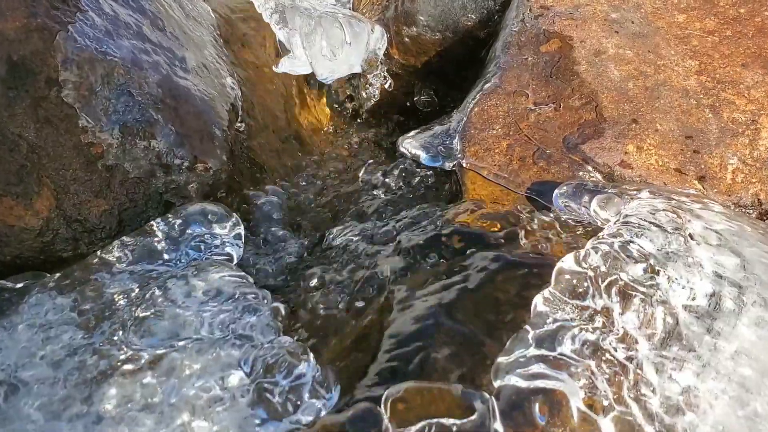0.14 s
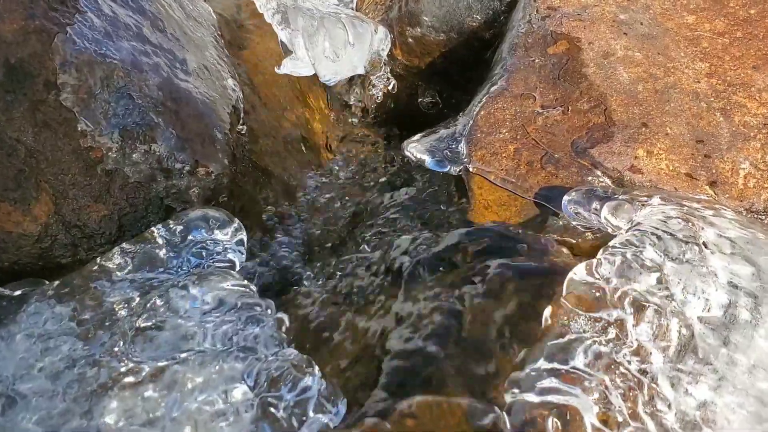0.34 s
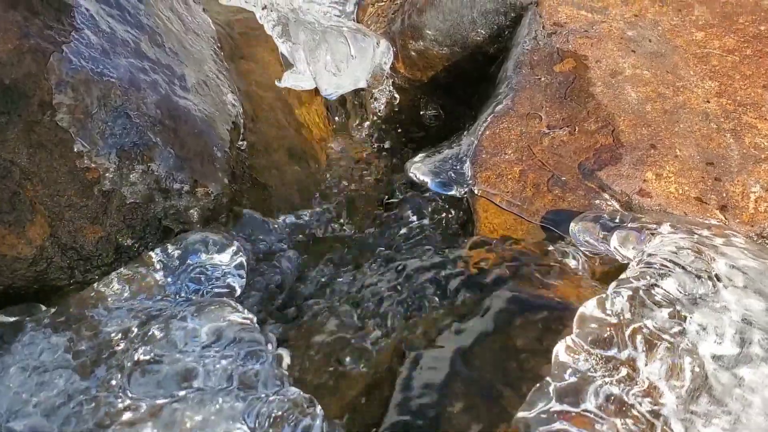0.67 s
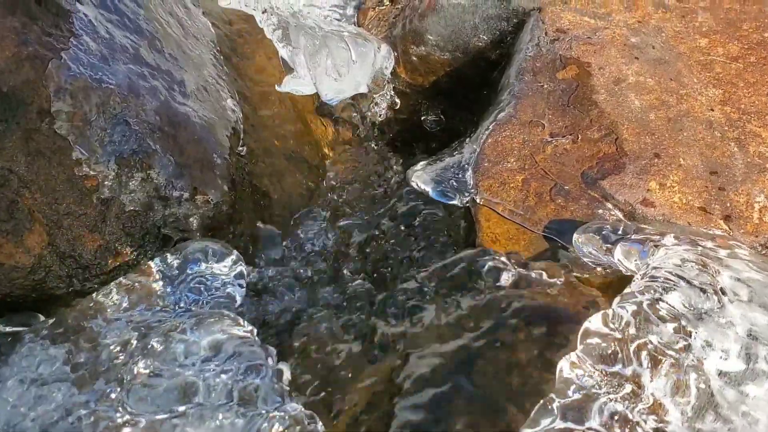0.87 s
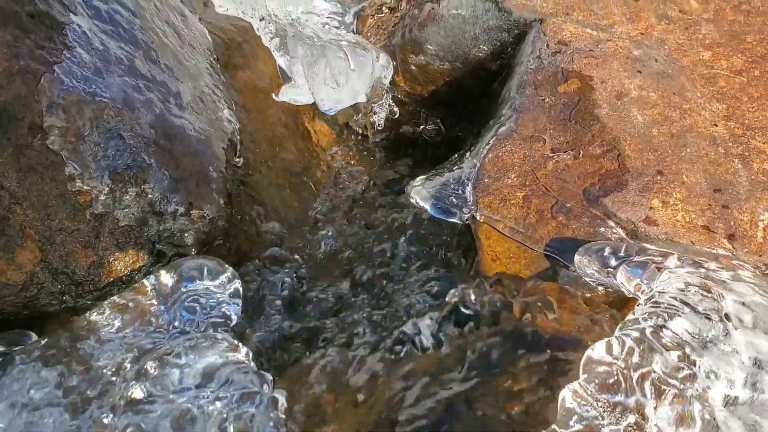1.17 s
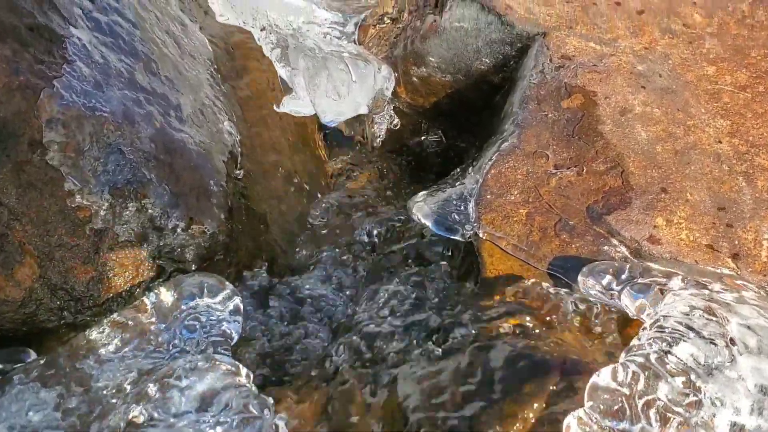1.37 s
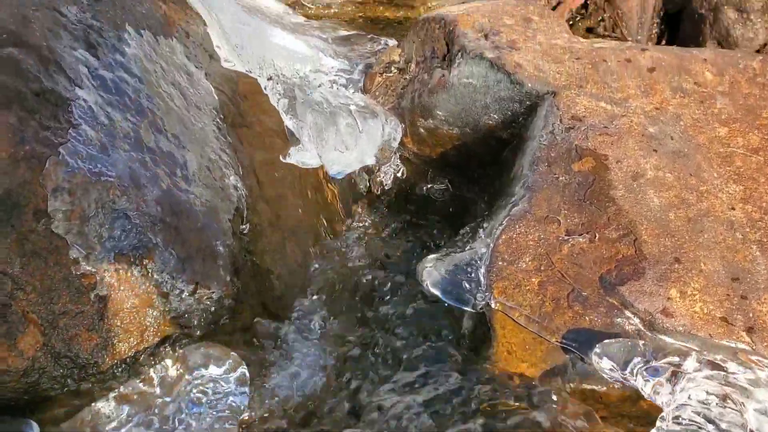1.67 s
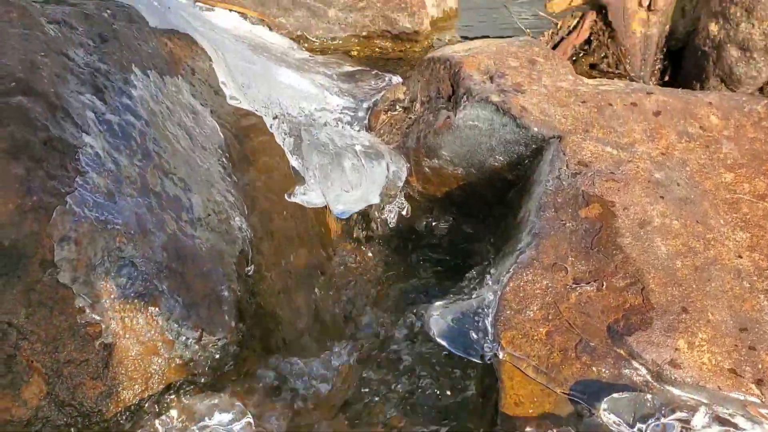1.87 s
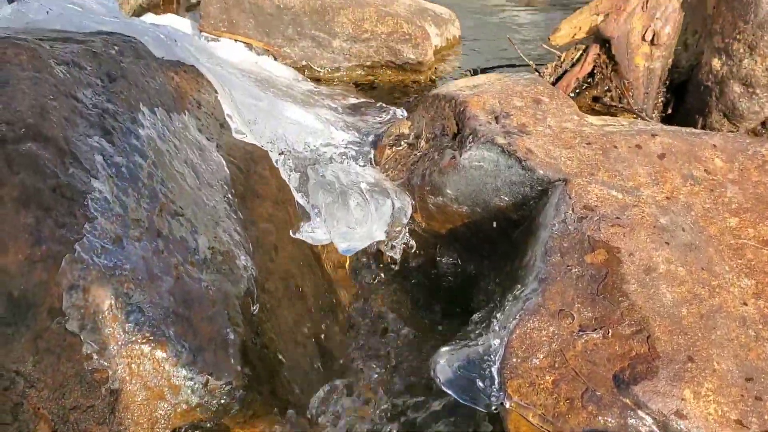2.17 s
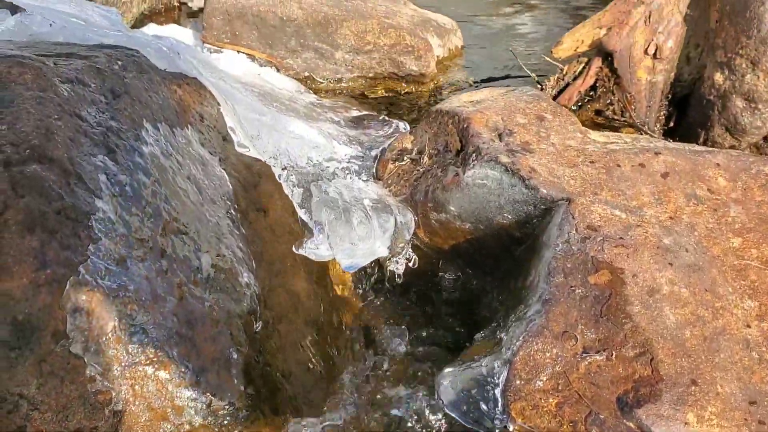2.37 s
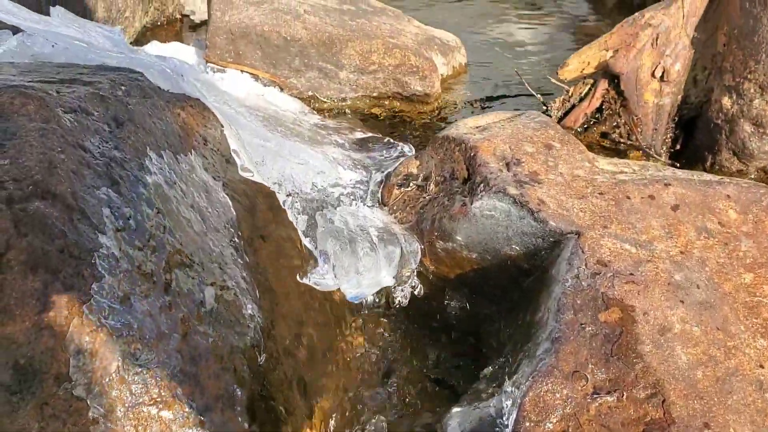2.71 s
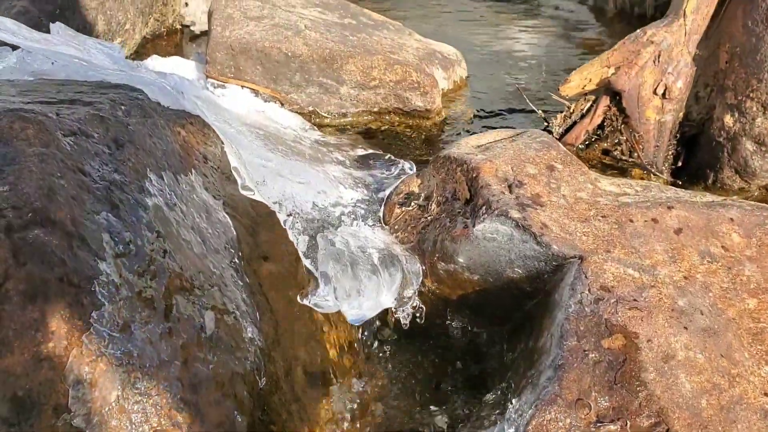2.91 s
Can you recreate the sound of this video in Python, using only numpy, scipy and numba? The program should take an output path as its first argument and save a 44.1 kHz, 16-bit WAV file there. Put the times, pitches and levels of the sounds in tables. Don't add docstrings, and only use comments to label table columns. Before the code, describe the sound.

Close, steady babble of a shallow brook over rocks, with ringing bubbles, small drips and a soft background hiss, while irregular wind rumbles and flutters on a hand-held camera's microphone before fading near the end.

```python
import sys
import numpy as np
from scipy import signal
from scipy.fft import irfft, next_fast_len
from scipy.io import wavfile
from scipy.ndimage import uniform_filter1d
from numba import njit

SR = 44100
rng = np.random.default_rng(int(sys.argv[2]) if len(sys.argv) > 2 else 0)


def wrap_up_sound(samples):
    columns = np.atleast_2d(samples).T
    tamed = np.clip(columns, -1, 1)
    steps = np.round(tamed * 32767).astype(np.int16)
    wavfile.write(sys.argv[1], SR, steps)


def how_loud(loudness_db):
    steps = np.asarray(loudness_db, float) / 20
    return 10 ** steps


N = 134505

# time in seconds, flow level in dB.
FLOW = [
    (0.0, -37),
    (2.04, -39),
    (3.05, -39),
]
# frequency in Hz, density in dB per Hz.
WATER_SPECTRUM = [(300, -3.5), (520, -3.5), (950, -10), (1500, -14), (2800, -17.5), (6700, -23),
                  (8100, -27), (16000, -28)]
# frequency in Hz, gain in dB.
WATER_LOW_FADE = [(100, -24), (300, 12)]
# frequency in Hz, density in dB per Hz.
WIND_SPECTRUM = [(25, -34), (50, -3.5), (80, -0.5), (130, -4.5), (250, -8), (450, -18), (1000, -34.5),
                 (2000, -59)]
# time in seconds, level in dB, brightness in dB per octave.
GUSTS = [(.24, -38, -4.5), (.42, -20, -5), (.53, -30.5, -1), (.84, -25, 0), (1.14, -26, -4),
         (1.27, -28.5, -4), (1.47, -18.5, 0.5), (1.58, -25, -2.5), (1.78, -35.5, -5.5), (1.86, -27.5, -3),
         (2.0, -28.5, -2.5), (2.1, -31, 5.5), (2.24, -23, 0.5), (2.35, -29, -3), (2.46, -24.5, 2),
         (2.62, -30.5, 1), (2.86, -29.5, -3), (2.95, -36, -10)]
# peak time in seconds, peak in dB, pitch in Hz,
# left minus right in dB.
THUMPS = [(0.458, -23, 70, 1), (0.5931, -19.5, 58, 4.0), (0.676, -17.5, 54.4, 0),
          (0.8536, -20.5, 113, 10.0), (0.9177, -12, 93, 3), (1.042, -19.5, 125, 3), (1.192, -11, 98, 0),
          (1.209, -8, 81, 0), (1.3291, -14.5, 84, 0), (1.4678, -17, 83, -1.0), (1.8723, -18.5, 77.4, 0),
          (2.045, -19, 118, 0), (2.1927, -16.5, 92, 1.0), (2.2253, -16, 61.4, 3), (2.269, -16.5, 64.5, 6),
          (2.43, -17, 128, 7), (2.4529, -16, 121, 3), (2.7406, -20.5, 60, -2), (2.864, -21.5, 74.5, -3)]
# peak time in seconds,
# peak in dB, pitch in Hz, left minus right in dB.
SWAYS = [(0.624, -10.5, 72, 0.5), (0.8278, -14.5, 79.6, -7), (0.9996, -16.0, 83, 2),
         (1.1096, -15.5, 85.5, -10.5), (1.2544, -15, 65.4, -3), (1.3723, -13.5, 81, -3),
         (1.421, -10.5, 71.6, -2), (1.613, -16, 91, 0.0), (2.026, -17.5, 85, 0), (2.1105, -16.5, 66, 6),
         (2.4017, -12.5, 95, 2), (2.5077, -18, 89, 1)]
# peak time in seconds, peak in dB, pitch in Hz, left minus right in dB.
SNAPS = [(0.142, -21.5, 326, -1), (0.237, -19, 353, 1), (0.3818, -27, 396, 5), (0.4392, -14.5, 406, -3),
         (0.542, -12, 213, 6), (0.602, -17.5, 387, -3.0), (0.742, -13.5, 348, -2), (0.799, -13, 250, 0),
         (0.8123, -14, 200, -5), (0.8592, -14.5, 253, 1), (0.9817, -17.5, 187, 10.5), (1.06, -21, 181, 9),
         (1.193, -10, 177, -2), (1.211, -11, 170, -4), (1.4115, -18.5, 386, 2.0), (1.4459, -18.5, 361, 6),
         (1.504, -15.5, 400, 2), (1.521, -21, 406, 3), (2.0431, -20.0, 430, -7.0), (2.0783, -14, 420, 4),
         (2.079, -13.5, 246, 0.0), (2.1046, -16.0, 475, -10), (2.1056, -17, 290, 2), (2.143, -18, 320, -4),
         (2.1935, -10.5, 447, -3), (2.2314, -11.5, 460, -4), (2.247, -10, 302, 1), (2.4593, -11.5, 210, 2),
         (2.4725, -15.5, 354, 1), (2.535, -18, 347, -3), (2.6943, -20.0, 206, 11.5),
         (2.8117, -24.5, 188, 17.5)]
# time in seconds, peak in dB.
SPRAYS = [(0.1235, -22.5), (0.2698, -21.5), (0.3662, -25), (0.4165, -24.5), (0.735, -24), (0.754, -22.5),
          (0.772, -22), (1.1394, -26), (1.1767, -22), (1.2456, -29), (1.3114, -26.5), (1.3933, -26),
          (1.7669, -25), (1.8176, -30), (1.9664, -27), (2.1794, -27.5), (2.4493, -24), (2.5232, -26),
          (2.5394, -17), (2.8095, -27), (2.8405, -22), (2.9307, -27), (2.6, -23), (1.598, -28.5),
          (0.838, -24.5)]
# peak time in seconds, peak in dB, pitch in Hz.
GLUGS = [(0.0585, -27.5, 700), (0.141, -26, 715), (0.1951, -21, 800), (0.1955, -25.5, 1321),
         (0.2709, -34, 1340), (0.2863, -25, 1149), (0.5087, -28, 1080), (0.6675, -20.5, 960),
         (0.7112, -22.5, 633), (0.79, -29, 755), (0.8571, -24.0, 750), (1.002, -24, 925),
         (1.0068, -29, 1282), (1.1628, -29, 590), (1.1889, -21.5, 930), (1.3815, -27, 547),
         (1.5034, -27, 602), (1.5397, -26, 1563), (1.7696, -34, 1600), (1.7706, -21.5, 625),
         (2.0622, -27.5, 1610), (2.1093, -31, 844), (2.1312, -27, 1340), (2.1416, -31, 547),
         (2.1776, -29, 1274), (2.5227, -31.0, 1243), (2.5427, -21, 840), (2.5639, -28, 1258),
         (2.7784, -25, 876), (2.7794, -24.5, 1340), (2.8081, -20, 914), (2.819, -19, 1510),
         (2.8438, -26, 616), (2.9151, -34, 1210)]
# peak time in seconds, peak in dB, pitch in Hz.
PLINKS = [(0.1058, -28, 3230), (0.1103, -20, 2520), (0.1235, -31, 2709), (0.1393, -27.5, 2834),
          (0.1915, -27, 2040), (0.3072, -31, 4009), (0.3083, -13, 3300), (0.3456, -26.5, 2950),
          (0.368, -23, 7062), (0.418, -19, 7094), (0.4777, -30, 7050), (0.5171, -27.0, 2070),
          (0.5628, -25.0, 5370), (0.7032, -22.5, 4200), (0.7315, -21, 6640), (0.9968, -22, 3038),
          (1.1408, -21.5, 6470), (1.1525, -20, 2760), (1.1712, -34, 3664), (1.3281, -19, 2450),
          (1.3949, -23.5, 7120), (1.4811, -20, 2340), (1.5566, -22, 1990), (1.5981, -21, 6100),
          (1.7219, -23, 4130), (1.9487, -20.5, 4640), (2.1419, -31, 3950), (2.4507, -24.5, 3554),
          (2.4508, -31, 4500), (2.5385, -23, 3429), (2.5407, -20, 4870), (2.5413, -26, 6812),
          (2.7007, -25.5, 3620), (2.7823, -18.5, 4100), (2.9319, -23, 6600)]

HISS_DB, BURST_DB, BURST_PER_S, HISS_FLICKER_DB = -2.5, 1.96, 50, 0.77
WIND_DB, WIND_PAN_DB, EDDIES_PER_S, EDDY_CYCLES, EDDY_SPREAD_DB = 1.5, 2.5, 900, 1.53, 2
FLUTTER_DB, FLUTTER_OWN_DB, FLUTTER_PER_S = 0.83, 2.5, 30
SURGE_DB, SURGE_S = -14.5, 0.043
THUMP_DB, THUMP_CYCLES, SNAP_DB, SNAP_CYCLES = -2.5, 1.92, -5.5, 2.95
BUBBLES_PER_S, BUBBLE_CYCLES, BUBBLE_SPREAD_DB, BUBBLE_DB, BUBBLE_GLIDE = 3000, 8, 3.5, 2, 0.16
CROWD_CAP_DB = 9.5
NEAR_LAG_S, FAR_LAG_S, LAG_SPREAD_S = -0.00028, 0.00036, 0.00004
NEAR_SHARE, WATER_PAN_DB = 0.6, -2.5
SPRAY_DB, SPRAY_S = -20, 0.009
GLUG_DB, GLUG_CYCLES, PLINK_DB, PLINK_CYCLES, POP_GLIDE = 5, 6.98, 2.5, 10.5, 0.052
PEAK_AT = 0.25
ROCK_T60_S, ROCK_DB = 0.02, -10


def colour(table, hz):
    table = np.array(table)
    return np.interp(np.log(hz), np.log(table[:, 0]), table[:, 1])


def set_treble(x, db):
    top = signal.sosfilt(signal.butter(2, 1500, "high", fs=SR, output="sos"), x)
    return x * how_loud(db) / np.sqrt(np.mean(top ** 2))


def walk(rate_hz):
    hold = int(SR / rate_hz)
    steps = np.repeat(rng.standard_normal(N // hold + 1), hold)[:N]
    return 1.3 * uniform_filter1d(uniform_filter1d(steps, hold), hold)


@njit
def rings(start_s, hz, cycles, size, glide):
    out = np.zeros(N)
    for e in range(len(start_s)):
        span = cycles[e] * SR / hz[e]
        first = int(start_s[e] * SR)
        step = 2j * np.pi * hz[e] / SR
        z = size[e] + 0j
        turn = 10 ** (-1 / span) * np.exp(step)
        bend = np.exp(step * glide / span)
        rise, quick = 1.0, np.exp(-6 / span)
        for j in range(int(2 * span) + 2):
            if 0 <= first + j < N:
                out[first + j] += (1 - rise) * z.imag
            z *= turn
            turn *= bend
            rise *= quick
    return out


def hiss(flow_db, burst):
    n = next_fast_len(N)
    f = np.fft.rfftfreq(n, 1 / SR) + 1
    spectrum = how_loud(colour(WATER_SPECTRUM, f) + colour(WATER_LOW_FADE, f))
    out = 0
    for hz in 150 * 2 ** np.arange(0, 7, 0.5):
        shape = spectrum * np.cos(np.clip(np.log2(f / hz), -0.5, 0.5) * np.pi)
        noise = rng.standard_normal((2, len(f))) + 1j * rng.standard_normal((2, len(f)))
        band = irfft(noise * shape, n)[:, :N]
        out = out + band * how_loud(BURST_DB * burst * min(0.1 + hz / 4000, 1) + HISS_FLICKER_DB * walk(14))
    return set_treble(out, flow_db + HISS_DB)


def knocks(table, side, gain_db, cycles, sign):
    t, peak_db, hz, pan_db = np.array(table).T
    vary = rng.standard_normal((3, len(t)))
    start_s = t + (0.063 * vary[0] - PEAK_AT * cycles) / hz
    db = peak_db + gain_db + side * pan_db / 2 + 13 + 0.2 * vary[2]
    return rings(start_s, hz * (1 + 0.041 * vary[1]), np.full(len(t), cycles), how_loud(db) * sign, -0.023)


def eddies():
    u = rng.random((4, int(EDDIES_PER_S * N / SR)))
    gust_s, _, bright_db = np.array(GUSTS).T
    t, hz = u[0] * N / SR, 25 * 60 ** u[1]
    db = colour(WIND_SPECTRUM, hz) + 20 * np.log10(hz) - EDDY_SPREAD_DB * np.log(u[2])
    db = db + np.interp(t, gust_s, bright_db) * np.log2(hz / 100)
    x = rings(t, hz, np.full(len(t), EDDY_CYCLES), how_loud(db) * np.sign(u[3] - 0.5), 0.0)
    return x * how_loud(WIND_DB) / np.sqrt(np.mean(x ** 2))


def wind():
    shared, out = walk(FLUTTER_PER_S), []
    now, grid = np.arange(N) / SR, np.arange(0, N, 64) / SR
    gust_s, gust_db, _ = np.array(GUSTS).T
    snap_signs = np.sign(rng.standard_normal((2, len(SNAPS))) + 1.2)
    for side, snap_sign in zip((1, -1), snap_signs):
        power = how_loud(2 * np.interp(grid, gust_s, gust_db) + side * WIND_PAN_DB)
        for t0, db, _, pan_db in [*THUMPS, *SWAYS]:
            surge = np.exp(-((grid - t0) / SURGE_S) ** 2 * 2)
            power = power + how_loud(2 * (db + SURGE_DB) + side * pan_db) * surge
        curve_db = np.interp(now, grid, 10 * np.log10(power))
        flutter_db = FLUTTER_DB * shared + FLUTTER_OWN_DB * walk(FLUTTER_PER_S)
        port = eddies() * how_loud(curve_db + flutter_db)
        port = port + knocks(THUMPS, side, THUMP_DB, THUMP_CYCLES, 0.98)
        port = port + knocks(SWAYS, side, THUMP_DB, THUMP_CYCLES, side)
        out.append(port + knocks(SNAPS, side, SNAP_DB, SNAP_CYCLES, snap_sign))
    air = np.array(out)
    return air + air ** 2


def heard(t, hz, cycles, db, lag_s, glide=BUBBLE_GLIDE):
    hz = np.clip(hz, 20, 16000)
    lag_s = lag_s + LAG_SPREAD_S * rng.standard_normal(len(t))
    pan_db = WATER_PAN_DB * np.clip(1.5 - hz / 6000, -1, 1)
    return np.array([rings(t + side * lag_s / 2, hz, cycles, how_loud(db + side * pan_db / 2), glide)
                     for side in (1, -1)])


def babble(flow_db, burst):
    u = rng.random((5, int(BUBBLES_PER_S * N / SR)))
    hz, at = 150 * 100 ** u[1], (u[0] * N).astype(int)
    spread_db = np.minimum(-BUBBLE_SPREAD_DB * np.log(u[2]), CROWD_CAP_DB)
    db = colour(WATER_SPECTRUM, hz) + colour(WATER_LOW_FADE, hz) + 20 * np.log10(hz)
    db = db + spread_db * np.clip(1.3 - hz / 5000, 0.6, 2)
    db = db + BURST_DB * np.clip(burst[at], -3, 1.5) * np.clip(1.2 + hz / 3000, 0, 1)
    cycles = BUBBLE_CYCLES * (0.27 + 1.205 * u[3])
    lag_s = np.where(u[4] < NEAR_SHARE, NEAR_LAG_S, FAR_LAG_S)
    return set_treble(heard(u[0] * N / SR, hz, cycles, db, lag_s), flow_db + BUBBLE_DB)


def sprays(count=70):
    t, peak_db = np.repeat(np.array(SPRAYS), count, axis=0).T
    u = rng.random((5, len(t)))
    hz = 1500 + 14000 * u[1]
    spread_db = np.minimum(-3.8 * np.log(u[2]), CROWD_CAP_DB)
    db = peak_db + SPRAY_DB + 11.5 + spread_db - 0.54 * np.log2(hz / 8000)
    start_s = t - 0.002 + SPRAY_S * (u[0] + u[4]) * (1 + u[0]) / 4
    return heard(start_s, hz, 5.5 * (0.5 + u[3]), db, NEAR_LAG_S)


def pops(table, gain_db, cycles, count=2):
    t, peak_db, hz = np.repeat(np.array(table), count, axis=0).T
    u, twin = rng.random((2, len(t))), np.arange(len(t)) % count
    hz = hz * (1 - POP_GLIDE / 3) * (1 + 0.079 * twin * (u[0] - 0.5))
    start_s = t + cycles / hz * (twin * 0.6004 * u[1] - 1.3 * PEAK_AT)
    db = peak_db + gain_db + 4.5 - 6 * twin
    return heard(start_s, hz, np.full(len(t), cycles), db, NEAR_LAG_S, POP_GLIDE)


def rocks(x):
    t = np.arange(int(0.08 * SR)) / SR
    tail = rng.standard_normal((2, len(t))) * how_loud(-60 * t / ROCK_T60_S) * np.clip(t / 0.0012, 0, 1)
    tail = tail * how_loud(ROCK_DB) / np.sqrt(np.sum(tail ** 2, axis=1, keepdims=True))
    return x + signal.fftconvolve(x, tail, axes=1)[:, :N]


def scene():
    flow_db = np.interp(np.arange(N) / SR, *np.array(FLOW).T)
    burst = walk(BURST_PER_S)
    burst = burst - uniform_filter1d(burst, size=SR // 6)
    loud_bubbles = pops(GLUGS, GLUG_DB, GLUG_CYCLES) + pops(PLINKS, PLINK_DB, PLINK_CYCLES)
    water = rocks(babble(flow_db, burst) + sprays() + loud_bubbles) / 1.162
    return hiss(flow_db, burst) + wind() + water


def top_cut(x):
    return signal.sosfilt(signal.butter(12, 16780, fs=SR, output="sos"), x)


def record(dry):
    x = signal.sosfilt(signal.butter(2, 40, "high", fs=SR, output="sos"), dry)
    x = np.tanh(1.1 * x) / 1.1
    x = signal.sosfilt(signal.ellip(12, 0.2, 90, 15650, fs=SR, output="sos"), x)
    return top_cut(x)


dry = scene()
out = record(dry)
wrap_up_sound(out)
```